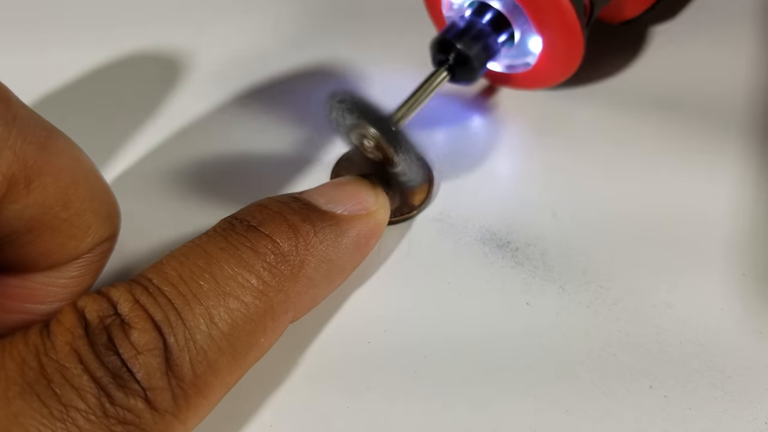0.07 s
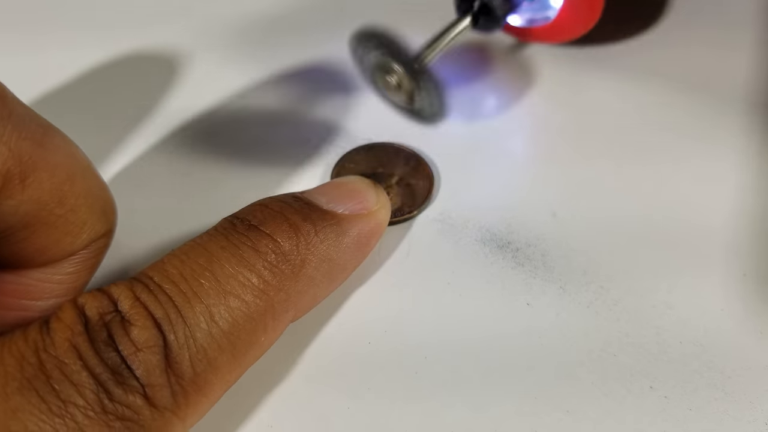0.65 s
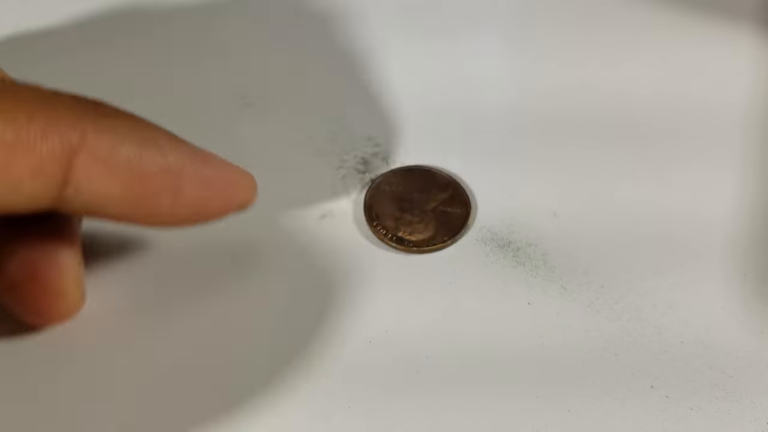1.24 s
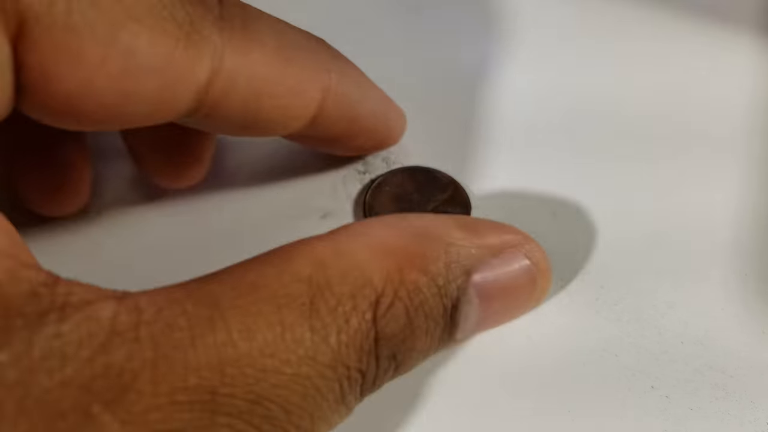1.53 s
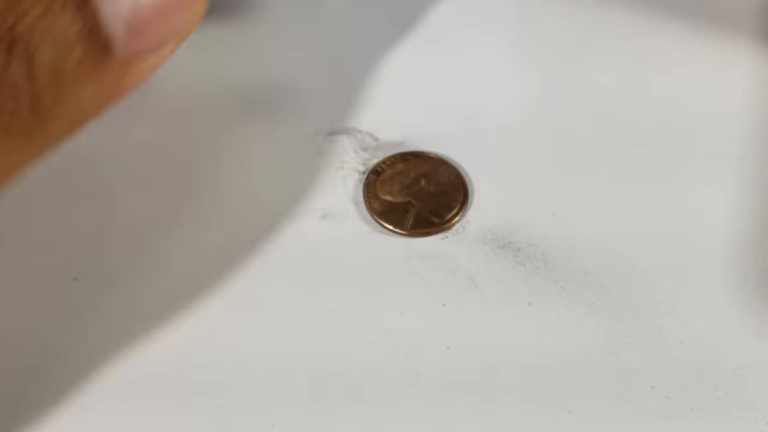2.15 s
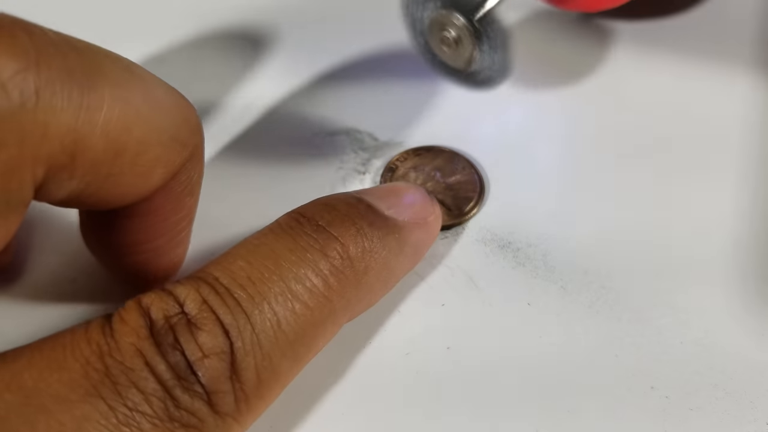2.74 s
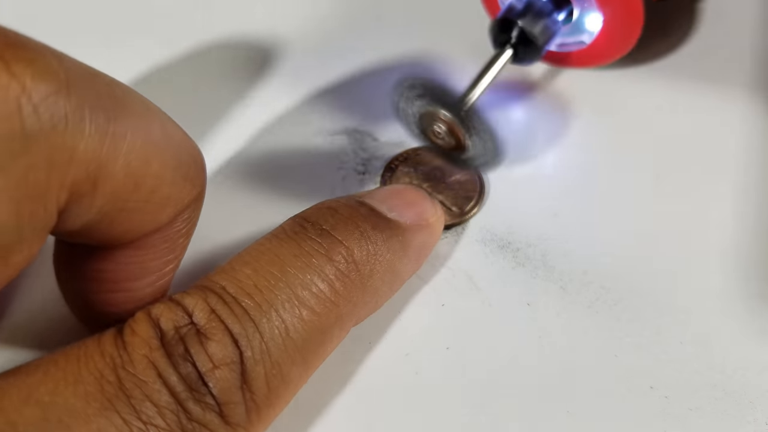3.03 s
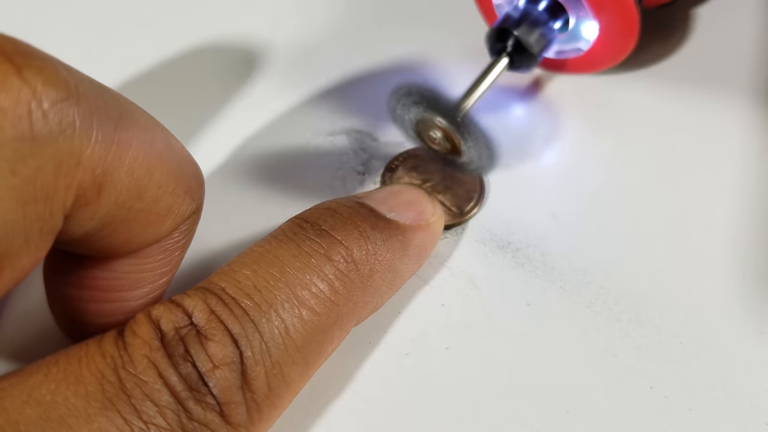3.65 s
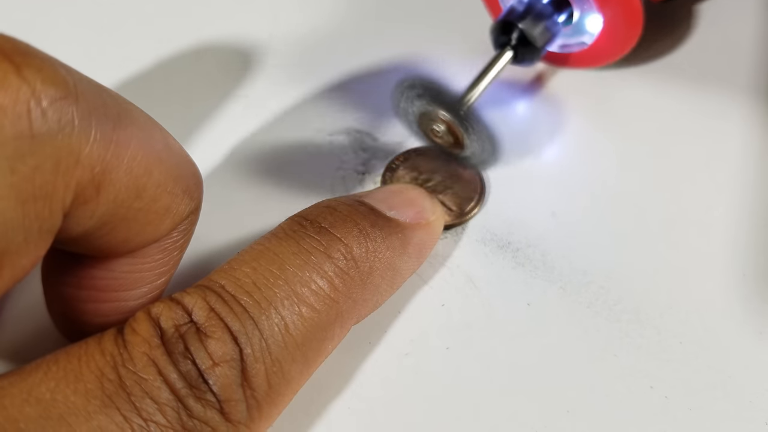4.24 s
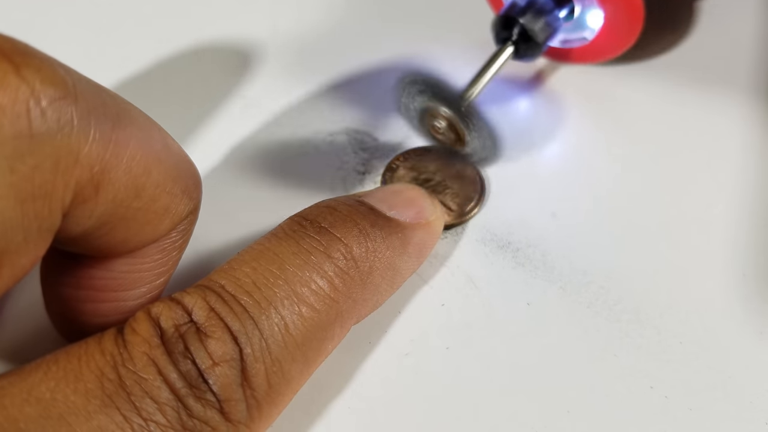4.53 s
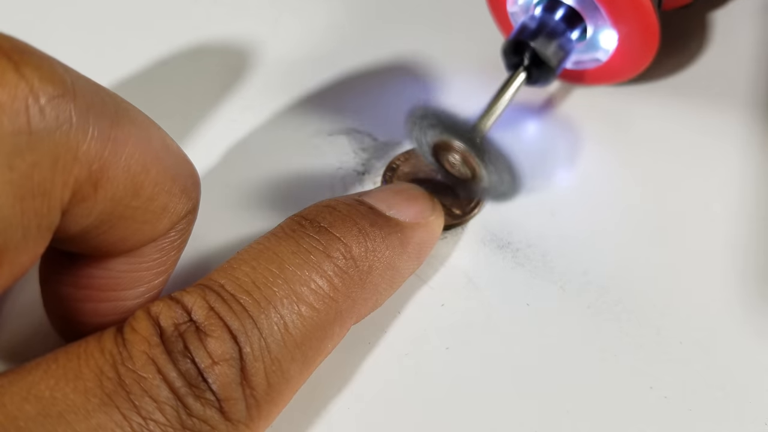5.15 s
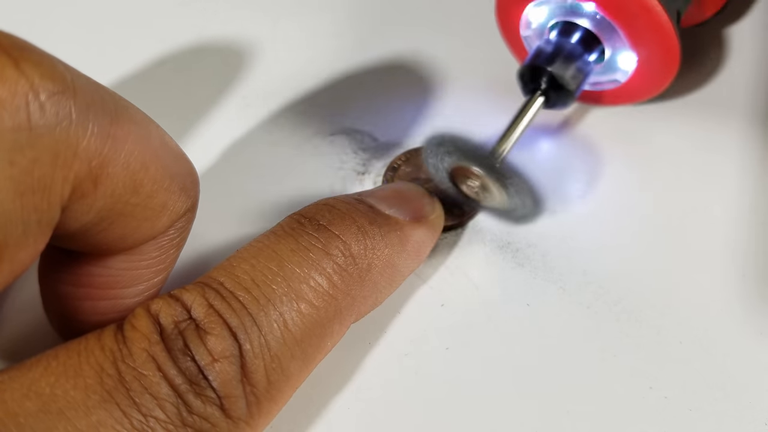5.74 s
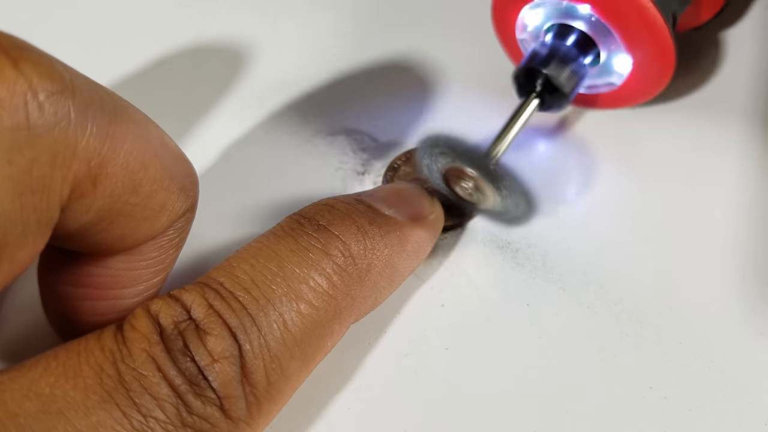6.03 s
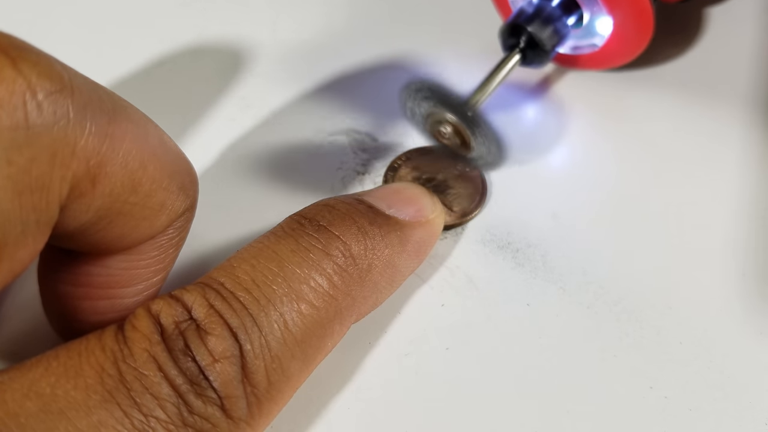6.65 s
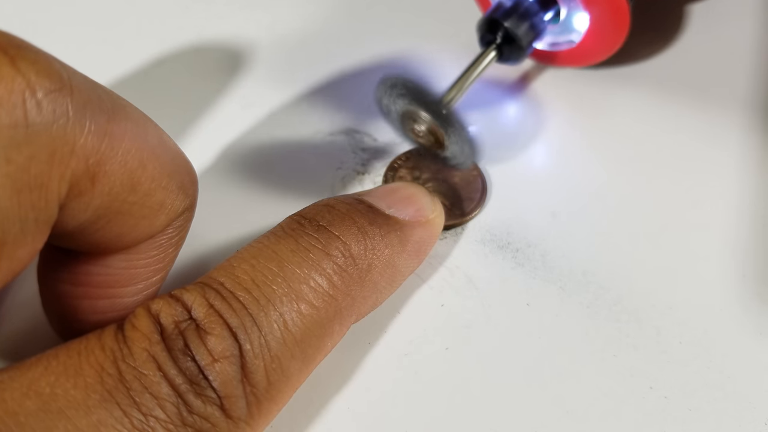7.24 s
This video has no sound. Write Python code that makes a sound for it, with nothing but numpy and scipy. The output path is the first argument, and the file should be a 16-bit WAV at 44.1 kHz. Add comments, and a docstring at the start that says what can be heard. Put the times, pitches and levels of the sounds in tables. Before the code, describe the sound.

A cordless rotary tool buzzes and whines while its wire wheel scrapes grittily against a coin. Almost at once the wheel lifts, the scrape falls away and the motor spins freely, a little higher. A few seconds later it presses down again: the pitch sags, and the scrape returns with sizzling flickers and a thin ring that comes and goes. Motor air rushes throughout, close by at a desk, over a faint room hum.

```python
"""A gritty scrape and a buzzing whine open the scene: a cordless rotary tool polishes a coin on a desk.
Within half a second its wire wheel lifts off and whines freely; near 3 s it comes back down, the
motor sags under the pressure and a thin ring comes and goes. The whine is a harmonic series on the
shaft speed; the scrape is the noise of wire tips striking metal, pulsing once a turn.
Underneath, air rushes from the motor and the room hums."""
import sys
import numpy as np
from scipy import signal
from scipy.fft import rfft, irfft, next_fast_len
from scipy.io import wavfile
from scipy.ndimage import map_coordinates

SR = 44100
rng = np.random.default_rng(int(sys.argv[2]) if len(sys.argv) > 2 else 0)


def to_wav(s):
    """Save 16-bit WAV."""
    ch = np.atleast_2d(s).T  # columns
    pcm = np.round(np.clip(ch, -1, 1) * 32767)  # PCM
    wavfile.write(sys.argv[1], SR, pcm.astype(np.int16))


N = 325899
STEP = 64  # samples per control tick
TIME = np.arange(N) / SR
TICKS = np.arange(0, N + STEP, STEP) / SR

# the wheel's touch: (time [s], contact [0 lifted, 1 on the coin])
CONTACT = [(0, 1), (.43, 1), (.46, 0.18), (2.85, 0.045), (3.15, 1)]


def shaft(idle_hz=244, sag_hz=10, inertia_s=0.02, tremor=0.0003, snag=0.0013, unsteady=0.0007):
    """Shaft angle and load: pressure slows the motor, inertia delays the sag, snagging wires add jitter."""
    keep = np.exp(-STEP / SR / inertia_s)
    pressed = pressure()
    drag = signal.lfilter([1 - keep], [1, -keep], pressed, zi=[keep * pressed[0]])[0]
    load = np.clip(drag, 0, 2)
    jitter = tremor * wobble(70) + load * (snag * wobble(110) + unsteady * wobble(16))
    speed_hz = (idle_hz - sag_hz * drag) * (1 + jitter)
    return 2 * np.pi * np.cumsum(np.interp(TIME, TICKS, speed_hz)) / SR, load


def pressure():
    """Superposed forces: the hand's steady lean plus its short pushes, on the control ticks."""
    # (time [s], pressure [1 = firm polishing])
    lean = [(0.0, 1.004), (0.414, 0.945), (0.5, 0.009), (1.414, 0.072), (2.885, 0.075), (3.16, 0.603),
            (3.296, 0.501), (3.69, 0.867), (4.085, 0.54), (4.171, 0.769), (4.388, 0.673), (4.825, 0.951),
            (6.055, 0.908), (6.419, 0.846), (7.388, 0.822)]
    # (start [s], length [s], added pressure [1 = firm polishing])
    pushes = [(0.078, 0.064, 1.393), (0.134, 0.092, 0.306), (0.335, 0.094, 0.534), (3.378, 0.132, 0.198),
              (3.796, 0.172, 0.553), (4.97, 0.287, 0.366), (5.239, 0.285, 0.477), (5.518, 0.232, 0.526),
              (5.824, 0.131, 0.438), (6.103, 0.168, 0.522), (6.542, 0.072, 0.14), (6.844, 0.138, 0.189),
              (7.053, 0.182, 0.19), (7.279, 0.227, 2.129)]
    # rise, hold and let go: (time [share of length], pressure [share of strength])
    push_shape = [(0, 0), (.25, 1), (.6, .85), (1, 0)]
    added = sum(strength * columns(push_shape, (TICKS - start) / length)[0]
                for start, length, strength in pushes)
    return columns(lean, TICKS)[0] + added


def whine(angle, load, drift_db=1.5, shake_db=0.62, scatter_hz=8000, widest_pan_db=14, orders=65):
    """Harmonic series: motor and wheel repeat each turn, so they sound at multiples of the shaft speed."""
    # between the microphones: (frequency [Hz], phase lead of the left [rad])
    phase_lead = [(235, 1.08), (470, -0.85), (940, -1), (1175, -1.84), (1450, -1), (1650, -1.5),
                  (1900, -1.73), (2350, -1.52), (2900, -1.93), (3500, -1.85), (4150, -2.5), (4550, -.5),
                  (5000, 2), (5400, 0.5), (5900, -1.8), (7200, -2)]
    contact = np.clip(columns(CONTACT, TICKS)[0], 0, 1)
    whine_db, buzz_db = swells(contact)
    ring_db = ring_level(contact, load)
    mean_hz = angle[-1] / (2 * np.pi * TIME[-1])
    turn = np.exp(1j * angle).astype(np.complex64)
    spin, out = np.ones_like(turn), np.zeros((2, N))
    for order in range(1, orders + 1):
        hz = order * mean_hz
        spin = spin * turn
        db, pan_db = order_levels(order, hz, contact)
        db = db + colour_db(hz, whine_db, buzz_db, ring_db) + release(hz)
        pan_db = np.clip(pan_db, -widest_pan_db, widest_pan_db)
        voice = flutter(hz, load) * np.exp(1j * rng.normal(0, 1.66))
        # reflections off the desk scramble the phase of short waves
        lead = along(phase_lead, hz) + rng.standard_normal() * (hz / scatter_hz) ** 2
        for channel, side in enumerate((1, -1)):
            # high orders swell and fade as the hand drifts and the touching wheel skids
            drift = min(hz / 4000, 1) * drift_db * wobble(1.47)
            skid = min(hz / 2000, 1) * shake_db * contact * wobble(20)
            share = 2 / np.sqrt(1 + amp(-2 * side * pan_db))
            gain = voice * share * amp(db + drift + skid) * np.exp(1j * side * lead / 2)
            out[channel] += (np.interp(TIME, TICKS, gain) * spin).real
    return out


def order_levels(order, hz, contact):
    """Loading reshapes the line spectrum: an order's level and balance in dB follow the contact."""
    # wheel lifted, one row per order from the first: (level [dB], left-right [dB])
    free_orders = [(-35.0, -7), (-43, -8), (-37.5, 3.5), (-30, 1), (-40, -14.5), (-46, 10), (-32.5, -16.5),
                   (-34.5, -2.5), (-37.5, 36), (-34, 0.5), (-41.5, 39), (-41.5, 3), (-41.5, -5), (-46, 6),
                   (-42, 3), (-52, -38), (-51.5, 6), (-47.5, -1), (-45.5, -1), (-47, -3.5), (-42.5, 5),
                   (-51.5, -20), (-44.5, 12), (-43.5, 6), (-45.5, -4), (-57, -6.0), (-54, 12), (-53, 45),
                   (-37.5, 11.5), (-36.5, -1), (-41.5, 10), (-63, 12)]
    # wheel on the coin, likewise: (level [dB], left-right [dB])
    loaded_orders = [(-34.5, -3.0), (-39, 4.5), (-32.5, -2.5), (-31, -1), (-34.5, 4), (-47, 17),
                     (-33.5, -1.5), (-39.5, 4), (-35.5, -4), (-33.0, 7.5), (-38, -5), (-43, 8),
                     (-37.5, 0.5), (-41, 12.5), (-39.5, -8), (-43, 2), (-44, 20), (-46.5, -3), (-50, 8),
                     (-49, 14), (-47.5, 23), (-48.5, 2), (-51, -9), (-50.5, 3), (-42.5, -2), (-45, 3),
                     (-44, 9), (-48.5, 9), (-45, 15), (-45, 18), (-39.5, 45), (-51, 14)]
    # higher orders: (frequency [Hz], lifted level [dB], loaded level [dB], left-right [dB])
    faint_orders = [(7540, -54, -46, -6), (8400, -53.5, -56.5, -4), (8900, -44, -42, 0),
                    (9130, -56, -67, -4), (10240, -48, -49, 0), (11400, -56.5, -60, 0),
                    (12200, -50, -52.5, -2.5), (13800, -60, -53, -4), (15500, -59, -53, 2)]
    if order <= len(free_orders):
        free, loaded = free_orders[order - 1], loaded_orders[order - 1]
    else:
        free_db, loaded_db, pan_db = columns(faint_orders, hz)
        free, loaded = (free_db, pan_db), (loaded_db, pan_db)
    return np.outer(free, 1 - contact) + np.outer(loaded, contact)


def flutter(hz, load, idle=0.11, loaded=0.12, rough_hz=2500, restless_hz=14000):
    """Random modulation broadens each line, high ones most: bending wires never strike twice alike."""
    blur = (hz / 10500) ** 4
    depth = (idle + loaded * load) * (hz / rough_hz) ** 1.1 + blur * (0.35 + load)
    slow = wobble(32) + 1j * wobble(32)
    fast = wobble(150) + 1j * wobble(150)
    fast_share = hz / (hz + restless_hz)
    modulation = np.sqrt(1 - fast_share) * slow + np.sqrt(fast_share) * fast
    return (1 + depth * modulation) / np.sqrt(1 + 2 * depth ** 2)


def colour_db(hz, whine_db, buzz_db, ring_db, ring_hz=7150, ring_width_hz=400):
    """Spectral envelope: each movement of the hand lifts the orders in its own band."""
    # the wheel's place on the coin: (time [s], position [-1 rim, 1 middle])
    ride = [(0, -0.64), (.44, -0.85), (.5, 0.26), (3, 0.11), (3.6, -0.64), (4.6, -0.24), (5.05, 0.024),
            (6.2, 0.77), (6.5, -0.12), (7.39, -0.27)]
    low = whine_db * along([(240, 0.57), (470, 0.83), (700, 0.71), (940, 1.15), (1200, 0.7),
                            (1650, 0.77), (1900, 0)], hz)
    buzz = buzz_db * along([(1200, 0.056), (1600, 0.43), (2500, 1.32), (3200, 0.5)], hz)
    # over the middle of the coin, the wires buzz higher
    ride_db = 5.5 * columns(ride, TICKS)[0]
    high = ride_db * along([(2600, 0.01), (3400, 0.83), (4000, 0.82), (4800, 0.35)], hz)
    # the ring has a sharp peak and, when strongly driven, a broad skirt below it
    peak = np.exp(-((hz - ring_hz) / ring_width_hz) ** 4)
    skirt = along([(4200, 0.0098), (5000, 1.0), (6100, 0.37), (6900, 0)], hz)
    return low + buzz + high + ring_db * (peak + skirt * np.clip(ring_db / 3, 0, 1))


def swells(contact, choke_db=1.0, restless_db=0.64):
    """Directivity: the tool's angle swells whine and buzz; skips jolt both, digging chokes the buzz."""
    # (time [s], whine lift [dB], buzz lift [dB])
    directivity = [(0, 3.5, 0.5), (.43, 5, 2.5), (.46, -2, 0.5), (.75, -1.1, -0.5), (1.15, 0.1, 0),
                   (1.75, 0, 0.9), (2.35, 0.3, 4), (2.88, -1.5, 3.5), (3.05, -3, 1.5), (3.3, -1.5, 1),
                   (3.5, 1, 2), (3.88, 1.9, 0.5), (4.4, -.5, -0.6), (4.8, 2.2, -0.6), (5.5, -0.2, -1.1),
                   (6.4, 2, -1.7), (7.39, 2, 0)]
    whine_db, buzz_db = columns(directivity, TICKS)
    skip_whine_db, skip_buzz_db, _ = skips()
    restless = restless_db * contact * wobble(14)
    choke = choke_db * np.maximum(dig(), 0)
    return whine_db + skip_whine_db + restless, buzz_db + skip_buzz_db + restless - choke


def ring_level(contact, load, touch_db=7, damp_db=12, light=0.65, span=0.38, waver_db=-2.6):
    """Contact damping: a light touch drives the thin ring hardest, and more pressure damps it."""
    # the ring with the wheel in the air: (time [s], lift [dB])
    free_ring = [(.56, -6), (1.06, -18), (2.05, -8), (2.35, -1.5), (3.0, -7.5)]
    damping = damp_db * np.tanh(np.maximum(load - light, 0) / span)
    touching = touch_db - damping + waver_db * wobble(12)
    return contact * touching + (1 - contact) * columns(free_ring, TICKS)[0]


def release(hz, start_s=0.44, lift_db=9.5, rise_s=0.023, settle_s=0.55, sing_hz=3150, width_hz=170):
    """Free vibration: wires leaving the coin sing and settle, lifting the orders near their note."""
    since = np.maximum(TICKS - start_s, 0)
    envelope = np.minimum(since / rise_s, 1) * np.exp(-since / settle_s)
    return lift_db * envelope * np.exp(-((hz - sing_hz) / width_hz) ** 2)


def scrape(angle, grit_db=-33.5, grit_dig_db=4.0, sizzle_db=-39, sizzle_dig_db=11, uneven_db=-0.3):
    """Friction noise: a gritty scrape with a spikier sizzle on top, both growing as the wires dig in."""
    # wire tips on metal: (frequency [Hz], relative density [dB], left-right [dB])
    grit_spectrum = [(500, -43, 7), (1380, -24, -8), (1670, 3.5, -1), (2520, -1.5, -20.5),
                     (2690, -6.5, -11), (5100, 1.5, 4.5), (6700, -8, -4), (6900, 1, 12), (8000, 0, -2),
                     (10000, -3.5, -5), (11600, -6, -11), (13000, -6, 15), (15400, -26, 10)]
    # the finest tips: (frequency [Hz], relative density [dB], left-right [dB])
    sizzle_spectrum = [(9000, -32, 0), (11700, -8, 4), (12700, 1, 4), (14300, 7, -2), (15400, 0.5, 12)]
    contact = np.clip(columns(CONTACT, TIME)[0], 0, 1)
    depth, uneven = dig(), uneven_db * wobble(18)
    hard_db = np.interp(TIME, TICKS, grit_db + grit_dig_db * depth + uneven)
    fine_db = np.interp(TIME, TICKS, sizzle_db + sizzle_dig_db * depth + uneven + skips()[2])
    strikes = recurring(flicks(angle, bite=0.13, grain=0.18), angle)
    grit = amp(hard_db) * coloured(strikes, grit_spectrum)
    sizzle = amp(fine_db) * coloured(flicks(angle, bite=0.25, grain=0.23), sizzle_spectrum)
    return np.sqrt(contact) * (grit + sizzle)


def flicks(angle, bite, grain):
    """Countless tip impacts merge into noise, thickest where the wheel's high side comes round."""
    noise = stereo_noise(alike_hz=3500)
    return noise * np.exp(bite * np.cos(angle) + grain * np.interp(TIME, TICKS, wobble(600)))


def recurring(tips, angle, recur=0.83, recur_hz=6500, turns=3):
    """Comb filtering: the same wires return each turn and repeat all but the finest detail."""
    total = tips
    for _ in range(turns):
        turn_before = np.array([np.interp(angle - 2 * np.pi, angle, channel) for channel in tips])
        tips = filtered(turn_before, lambda hz: recur / (1 + (hz / recur_hz) ** 4))
        total = total + tips
    return total


def dig(firm=0.95, give=0.63):
    """Saturating depth of the wires, -1 to 1: they bend aside, so heavy pressure adds little."""
    return np.tanh((pressure() - firm) / give)


def skips(half_length_s=0.035):
    """Intermittent contact: on the coin's relief the wheel briefly bites deeper or loses its grip."""
    # (time [s], whine lift [dB], buzz lift [dB], sizzle lift [dB])
    jolts = [(.125, -1, 0.5, -6), (3.15, 4, 2, -2), (3.43, 2, 0.5, -2), (3.68, 3, 2.5, -5),
             (3.86, 2, 1, 5.5), (4.06, -4.5, -.5, 0), (4.22, 2, -0.5, -3), (5.15, -1.5, 0, -2),
             (5.43, -1, 0, 2), (5.98, -1.5, -1.5, 9), (6.15, -1.5, 1, 2), (6.58, 0, 1, 4),
             (6.81, -0.5, 2, 9), (7.06, 0.5, 2, 10)]
    return sum(np.outer(lifts_db, np.exp(-((TICKS - at_s) / half_length_s) ** 2))
               for at_s, *lifts_db in jolts)


def rasp(angle, load, level_db=-137, load_db=10, centre_hz=2350, width_hz=230, bite=0.95):
    """Narrow-band friction: wires catch on the coin under load, here too faintly to be heard."""
    catches = stereo_noise(alike_hz=1500) * np.exp(bite * np.cos(angle))
    band = unit(filtered(catches, lambda hz: 1 / (1 + ((hz - centre_hz) / width_hz) ** 4)))
    return band * np.interp(TIME, TICKS, amp(level_db + load_db * load))


def air(angle, level_db=-34.5, chop=0.27):
    """Flow noise: the motor's rush of air, lightly chopped by the rotor once a turn."""
    # stirred air and the room: (frequency [Hz], relative density [dB])
    air_spectrum = [(20, -37), (60, 5), (110, -7), (170, 2), (380, -4.5), (620, -3), (830, 6.5),
                    (1050, -0.5), (1370, -6), (1600, 0), (2300, 2), (4000, -5.5), (6300, -7), (8000, -8.5),
                    (12800, -7), (15500, -14)]
    rush = stereo_noise(alike_hz=2600) * np.exp(chop * np.cos(angle))
    return amp(level_db) * unit(filtered(rush, lambda hz: amp(along(air_spectrum, hz))))


def hum(waver_db=3.0):
    """Pure tones: the room's steady hum, and an amplitude-modulated drone that sags and dies away."""
    # (frequency [Hz], rms level [dB])
    room_tones = [(59.2, -57.5), (118.4, -58), (156.1, -60)]
    # (time [s], frequency [Hz], level [dB])
    drone_path = [(0, 82, -47), (.3, 86.7, -48), (1.8, 86.9, -49.5), (2.3, 86.3, -44), (2.52, 75.3, -47),
                  (2.75, 62.8, -52), (3.15, 56, -54), (3.5, 56, -70)]
    steady = sum(amp(db) * np.sin(2 * np.pi * (hz * TIME + rng.random())) for hz, db in room_tones)
    drone_hz, drone_db = columns(drone_path, TIME)
    waver = waver_db * np.interp(TIME, TICKS, wobble(16))
    drone = amp(drone_db + waver) * np.sin(2 * np.pi * np.cumsum(drone_hz) / SR)
    return np.sqrt(2) * (steady + drone)


def rumble(level_db=-58.5, centre_hz=56):
    """Diffuse field: the room's low rumble is uncorrelated between the microphones."""
    noise = rng.standard_normal((2, N))
    return amp(level_db) * unit(filtered(noise, lambda hz: hz / centre_hz / (1 + (hz / centre_hz) ** 3)))


def stereo_noise(alike_hz, bass_side=0.41, lag=5.9):
    """Partial coherence: noise alike in the bass but not the treble, lag samples late on the left."""
    mid, side = rng.standard_normal((2, N))
    side = filtered(side, lambda hz: (hz + bass_side * alike_hz) / (hz + alike_hz))
    pair = np.array([mid + side, mid - side])
    return filtered(pair, lambda hz: np.exp(np.outer([-1, 1], 1j * np.pi * hz * lag / SR)))


def coloured(x, spectrum):
    """Shape a stereo pair by (frequency [Hz], level [dB], left-right [dB]) points, at rms 1."""
    def response(hz):
        db, pan_db = columns(spectrum, hz)
        return amp(db + np.outer([.5, -.5], pan_db))
    return unit(filtered(x, response))


def filtered(x, response):
    """Linear filtering: multiply the spectrum of x by a frequency response."""
    size = next_fast_len(N + SR // 4)
    return irfft(rfft(x, size) * response(np.fft.rfftfreq(size, 1 / SR)), size)[..., :N]


def wobble(rate):
    """A smooth random curve on the control ticks, rate knots a second."""
    knots = np.random.default_rng(rng.integers(2 ** 31)).standard_normal(int(TICKS[-1] * rate) + 4)
    return map_coordinates(knots, [TICKS * rate])


def columns(rows, at):
    """Interpolate each later column of a table at values of its first."""
    first, *rest = np.transpose(rows)
    return [np.interp(at, first, column) for column in rest]


def along(points, hz):
    """Interpolate (frequency [Hz], value) points on a log axis."""
    point_hz, values = np.transpose(points)
    return np.interp(np.log(hz + 1), np.log(point_hz + 1), values)


def amp(db):
    """Decibels to gain."""
    return 10 ** (np.asarray(db) / 20)


def unit(x):
    """Scale to rms 1."""
    return x / np.sqrt(np.mean(x ** 2) + 1e-20)


def scene():
    """Superposition: one shaft drives the whine, the scraping and the air; the room lies underneath."""
    angle, load = shaft()
    return whine(angle, load) + scrape(angle) + rasp(angle, load) + air(angle) + hum() + rumble()


def record(dry):
    """Band limiting: an ideal low-pass keeps nothing above 15.8 kHz."""
    return filtered(dry, lambda hz: hz < 15800)


dry = scene()
out = record(dry)
to_wav(out)
```